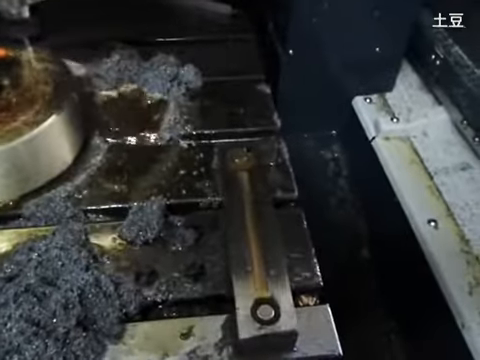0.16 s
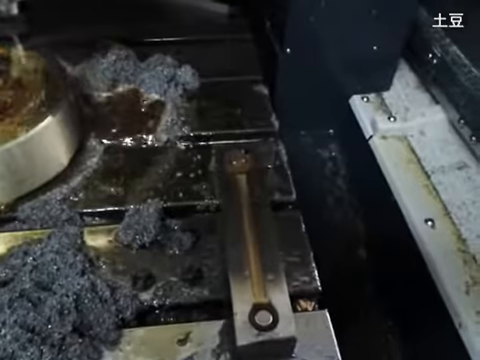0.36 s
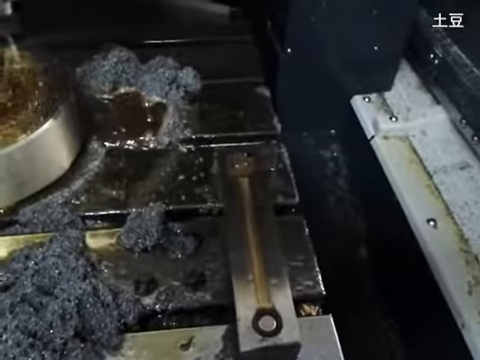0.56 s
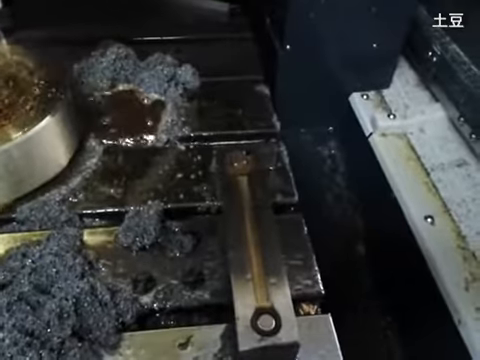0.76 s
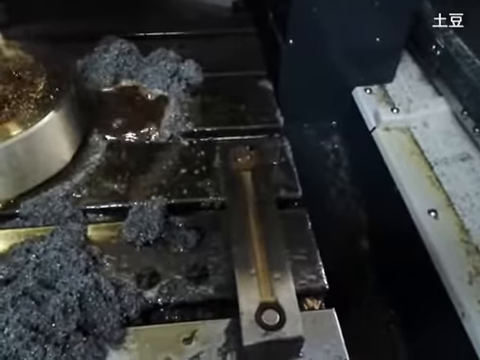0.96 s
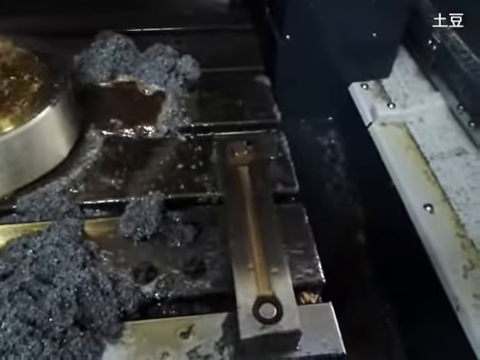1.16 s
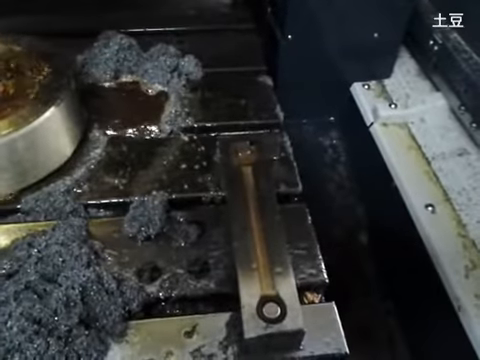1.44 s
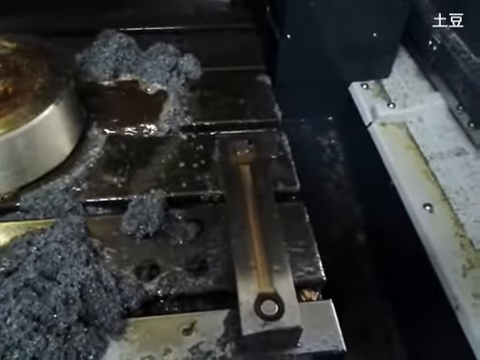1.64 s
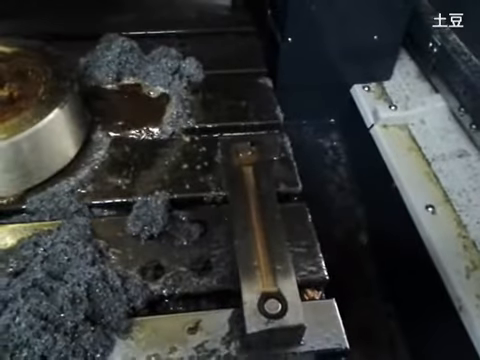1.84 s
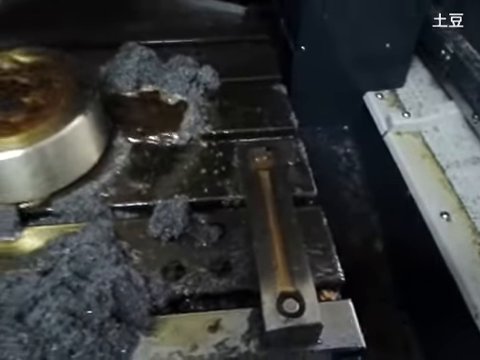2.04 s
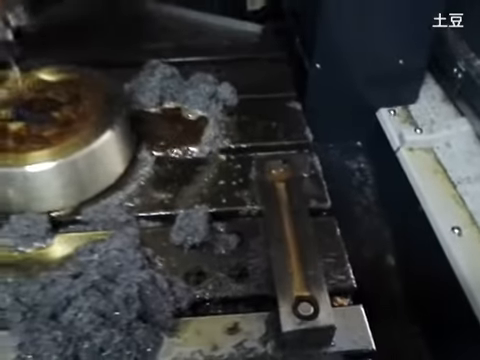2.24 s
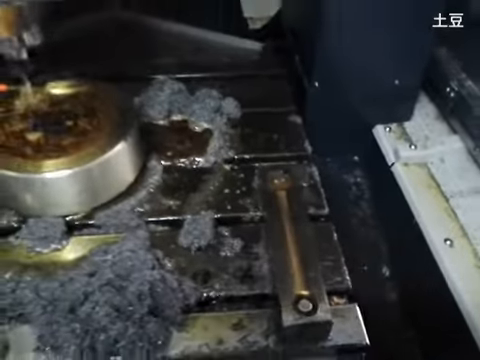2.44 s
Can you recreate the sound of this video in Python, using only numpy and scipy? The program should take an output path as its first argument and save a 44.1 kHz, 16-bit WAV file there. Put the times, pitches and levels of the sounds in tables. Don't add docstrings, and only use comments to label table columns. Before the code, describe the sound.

Loud, steady metal-cutting drone with wavering whine, rough noise and coolant hiss, heard close up

```python
import sys
import numpy as np
from scipy import signal
from scipy.fft import rfft, irfft
from scipy.io import wavfile
from scipy.ndimage import uniform_filter1d

SR = 44100
rng = np.random.default_rng(int(sys.argv[2]) if len(sys.argv) > 2 else 0)


def rack_gain(trim_db):
    fader = np.asarray(trim_db, float)
    return 10 ** (fader / 20)


def put_to_file(sound):
    columns = np.atleast_2d(sound).T
    safe = np.clip(columns, -1, 1)
    whole_steps = np.round(safe * 32767)
    wavfile.write(sys.argv[1], SR, whole_steps.astype(np.int16))


N = 113778
t = np.arange(N) / SR
SHAFT_HZ = 109.87


def walk(rate):
    hold = int(SR / rate)
    steps = np.repeat(rng.standard_normal(N // hold + 1), hold)
    return 1.54 * uniform_filter1d(uniform_filter1d(steps, hold), hold)[:N]


def read(table, hz):
    table = np.array(table)
    return np.interp(np.log(hz), np.log(table[:, 0]), table[:, 1])


def curve(table):
    return rack_gain(np.interp(t, *np.array(table).T))


def rough_band(width_hz):
    return walk(width_hz) + 1j * walk(width_hz)


def tone(hz, db, echo, null_s, turns, wobble):
    phase = 2 * np.pi * (hz * t + rng.random()) + wobble
    creep = np.pi * turns * (t - null_s)
    pair = np.cos(phase - creep) - echo * np.cos(phase + creep)
    flicker_db = 0.6 * walk(20)
    return np.sqrt(2) * rack_gain(db + flicker_db) * pair


# (f/Hz, width/Hz, level/dB)
NOTCHES = [(1500, 60, -3), (2680, 50, -7), (3250, 60, -8), (3560, 90, -6), (4450, 100, -4), (6950, 50, -9)]


def roar(table, swell_db, patchy_db, rate, count):
    hz = np.maximum(np.arange(N // 2 + 1) * SR / N, 1)
    shaped = rfft(rng.standard_normal(N)) * rack_gain(read(table, hz)) * np.sqrt(SR / 2)
    notch_db = sum(db * np.exp(-((hz - f) / width) ** 2) for f, width, db in NOTCHES)
    shaped = shaped * rack_gain(notch_db)
    low, high = table[0][0], table[-1][0]
    place = count * np.log(hz / low) / np.log(high / low)
    shaped = shaped * (place >= 0) * (place < count)
    out, swell = 0, walk(1.3)
    for k in range(count + 1):
        share = np.cos(np.pi / 2 * np.clip(place - k, -1, 1)) ** 2
        band = irfft(shaped * share, N)
        out = out + band * rack_gain(swell_db * swell + patchy_db * walk(rate))
    return out


# (f/Hz, level/dB per Hz)
RUMBLE = [(25, -53.5), (60, -52.5), (160, -54), (350, -61), (1050, -61), (1450, -56.5), (1720, -50.5),
          (2000, -56)]
# (t/s, level/dB)
BED_SWELL = [
    (0, -4),
    (.35, -3),
    (.95, -0.8),
    (1.5, -1.3),
    (2.05, 1.3),
    (2.3, -3.5),
    (2.58, -5.5),
]


def machine_rumble():
    rumble = roar(RUMBLE, 0.3, 0.7, 8, count=12)
    bed_filter = signal.butter(2, 230, fs=SR, output="sos")
    bed = signal.sosfilt(bed_filter, rumble)
    return rumble + bed * (curve(BED_SWELL) - 1)


# (f/Hz, level/dB per Hz)
COOLANT = [(5000, -65), (5900, -61), (6300, -64.5), (6700, -70.5), (7150, -73), (7400, -89.5), (8100, -91),
           (8600, -104.0)]


def coolant_hiss():
    return roar(COOLANT, 0.68, 2.3, 16, count=14)


# (f/Hz, level/dB)
PUMP = [(296, -46), (793, -42), (943, -46), (1098.7, -46)]


def pump():
    return sum(tone(hz, db, 0.4, rng.random() * 2, 0.4, 0.5 * walk(6)) for hz, db in PUMP)


# (f/Hz, level/dB, echo share 0-1, cancels at t/s, echo turns/s)
DRIVE = [(40.3, -38.7, 0.5, 0.45, 0.54), (82.5, -38.9, 0.95, 0.4, 0.4), (99.5, -38.3, 0.3, 0.7, 0.44),
         (5255.3, -39.1, 0.45, 2.15, 0.34), (5914.8, -37.2, 0.8, 2.65, 0.64),
         (6131.7, -45.1, 0.8, 2.3, 0.22), (6274.2, -46.4, 0.5, 0.75, 0.84), (7011, -53.4, 0.95, 3.1, 0.14),
         (7770, -53.0, 0.95, 0.55, 0.08), (7879, -63.9, 0.9, 1.05, 0.22), (8538, -67.0, 0.25, 1.2, 0.78)]


def drive():
    out = 0
    for hz, db, echo, null_s, turns in DRIVE:
        whine = tone(hz, db, echo, null_s, turns, 0.49 * walk(15))
        out = out + whine * rack_gain(2 * walk(25))
    return out


# (first f/Hz, spacing in shaft rates, level over the noise/dB, last f/Hz)
COMBS = [(3296.1, 1, 8, 4400), (4724.4, 1, 4, 5100), (5493.5, 2, 6, 6900), (4596, 2, 7, 7300),
         (7330, 1, 9, 8700)]


def faint_combs():
    trim_db, scatter_db = 1.9, 2
    out = 0
    for first, step, over_db, last in COMBS:
        for hz in np.arange(first, last, step * SHAFT_HZ):
            noise_db = read(CUTTING + COOLANT[1:], hz)
            db = noise_db + over_db + trim_db + scatter_db * rng.standard_normal()
            turns = 0.3 + 0.4 * rng.random()
            out = out + tone(hz, db + 7, 0.7, rng.random() * 2, turns, 0.3 * walk(15))
    return out


# (t/s, length/s, start f/Hz, end f/Hz, width/Hz, level/dB)
CHIPS = [
    (2.438, .022, 3450, 3450, 800, -28),
    (2.462, .02, 3600, 3600, 1000, -29),
    (2.485, .016, 3400, 3400, 500, -24),
    (2.492, .018, 4150, 4150, 250, -28),
    (1.17, .06, 1400, 1320, 30, -27),
]


def chips():
    out = 0
    for start, length, hz0, hz1, width_hz, db in CHIPS:
        u = (t - start) / length
        turns = np.cumsum(hz0 + (hz1 - hz0) * np.clip(u + 0.5, 0, 1)) / SR
        band = np.real(rough_band(width_hz) * np.exp(2j * np.pi * turns))
        out = out + rack_gain(db) * np.exp(-2 * u ** 2) * band
    return out


def chatter():
    pitch_hz, width_hz, start_db, fade_db_per_s = 2830, 90, -29, 2.5
    ring = np.real(rough_band(width_hz) * np.exp(2j * np.pi * pitch_hz * t))
    return rack_gain(start_db - fade_db_per_s * t) * ring


# (f/Hz, level/dB per Hz)
CUTTING = [(2000, -54.5), (2500, -57.5), (2850, -53.5), (3080, -56.5), (3300, -65), (3600, -69.5),
           (4200, -66.0), (5000, -68)]


def cutting_roar():
    tooth = 1 + 0.18 * np.cos(2 * np.pi * SHAFT_HZ * t)
    return roar(CUTTING, 0.39, 2.5, 14, count=18) * tooth


# (multiple of shaft rate, level/dB, echo share 0-1, cancels at t/s, echo turns/s)
SPINDLE = [(4, -36.3, 0.45, 2.4, 0.3), (5, -43.3, 0.4, 0.5, 0.32), (7, -46.9, 0.45, 1.1, 0.52),
           (8, -27.9, 0.85, 0.5, 0.1), (9, -38.2, 0.75, 1.05, 0.42), (11, -43.9, 0.75, 2.35, 0.14),
           (12, -26.3, 0.85, 2.1, 0.08), (15, -19.8, 0.6, 2.7, 0.32), (16, -21.5, 0.85, 2.0, 0.46),
           (17, -35.0, 0.7, 0.35, 0.4), (18, -23.0, 0.75, 1.5, 0.08), (19, -33.0, 0.55, 1.4, 0.46),
           (20, -27.6, 0.3, 1.5, 0.78), (21, -34.3, 0.5, 0.9, 0.2), (22, -41.1, 0.35, 2.3, 0.24),
           (23, -28.6, 0.7, 2.15, 0.08), (24, -41.4, 0.65, 0.55, 0.56), (25, -39.0, 0.85, 0.45, 0.46),
           (26, -30.3, 0.65, 3.05, 0.22), (27, -39.2, 0.4, 1.8, 0.54), (28, -30.4, 0.4, 0.8, 0.4),
           (29, -45.4, 0.35, 2.45, 0.88)]


def spindle():
    trim_db, wobble_rad = 0.37, 0.12
    sway = walk(12)
    out = 0
    for k, db, echo, null_s, turns in SPINDLE:
        out = out + tone(k * SHAFT_HZ, db, echo, null_s, turns, wobble_rad * sway * k / 20)
    return rack_gain(trim_db) * out


# (t/s, level/dB)
LOAD = [
    (0, 1.65),
    (.7, -0.4),
    (1.5, 0.78),
    (2.58, 0),
]


def scene():
    noise = machine_rumble() + coolant_hiss() + cutting_roar()
    tones = pump() + drive() + faint_combs() + spindle()
    return (curve(LOAD) * noise + tones + chips() + chatter())[None]


# (f/Hz, level/dB per Hz)
COARSE = [(30, -62), (1000, -66), (2600, -53), (3400, -60), (4600, -59.5), (5900, -60), (6900, -68),
          (7500, -83), (8600, -92)]


def coarse_rounding(x, size=2048):
    top_hz, scatter_db, band_hz = 8700, 3.5, 150
    k = np.arange(size * top_hz * 2 // SR) + 0.5
    n = np.arange(2 * size) + 0.5
    window = np.sin(np.pi * n / size / 2)[:, None]
    basis = window * np.cos(np.pi / size * np.outer(n + size / 2, k)) * np.sqrt(2 / size)
    blocks = np.pad(x, (size, 2 * size - N % size)).reshape(-1, size)
    lines = np.hstack([blocks[:-1], blocks[1:]]) @ basis
    hz = k * SR / size / 2
    luck = rng.standard_normal((len(lines), 100))[:, (hz // band_hz).astype(int)]
    step = rack_gain(read(COARSE, hz) + scatter_db * luck) * np.sqrt(SR / 2)
    rounded = np.sign(lines) * np.floor(np.abs(lines) / step + 0.4) * step
    back = rounded @ basis.T
    return (back[:-1, size:] + back[1:, :size]).ravel()[:N]


def low_pass(x):
    return signal.sosfilt(signal.butter(12, 15700, fs=SR, output="sos"), x)


def record(dry):
    softened = np.tanh(0.2 * dry[0]) / 0.2
    mix = coarse_rounding(softened)[None]
    return low_pass(mix)


dry = scene()
out = record(dry)
put_to_file(out)
```